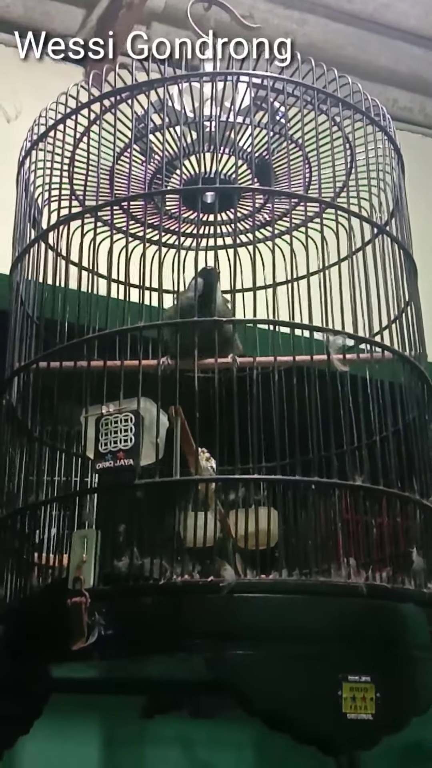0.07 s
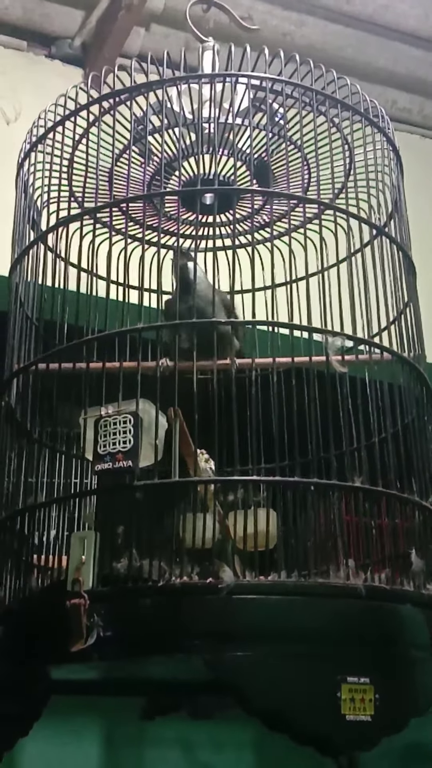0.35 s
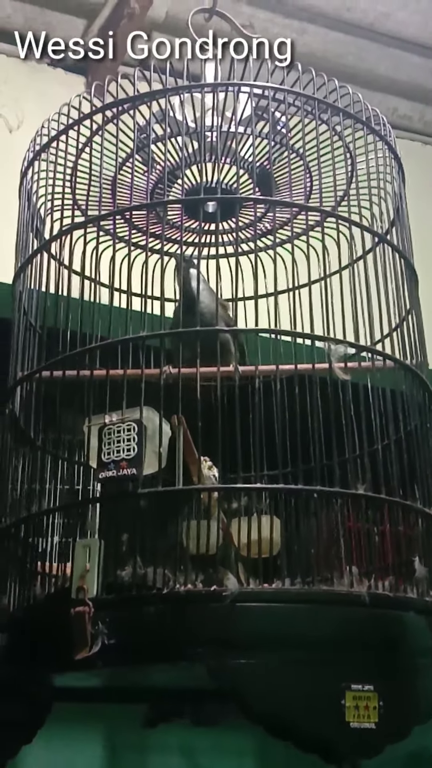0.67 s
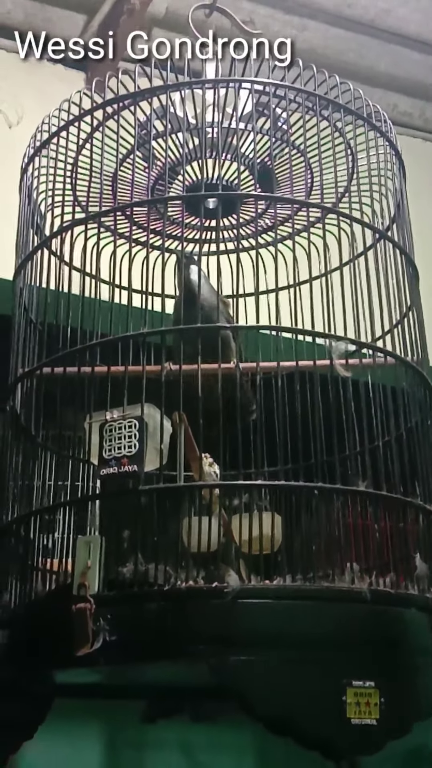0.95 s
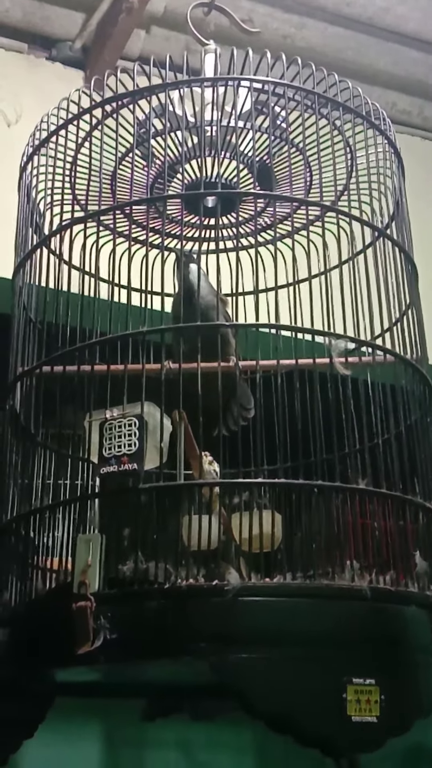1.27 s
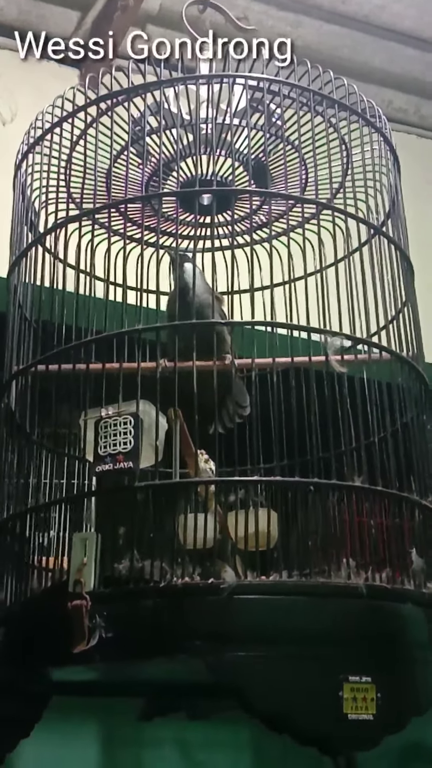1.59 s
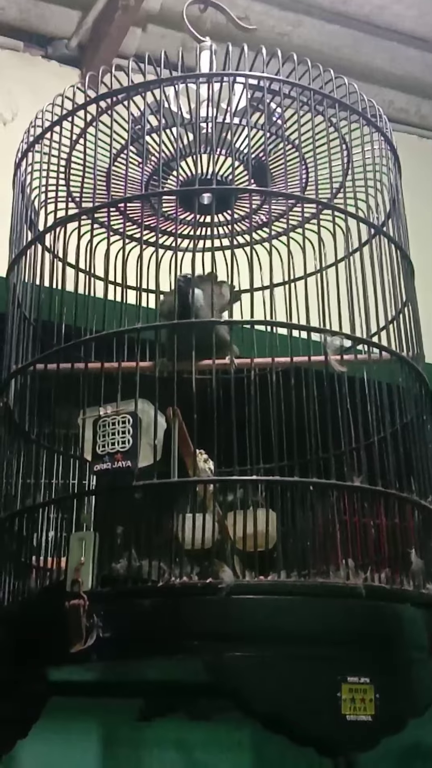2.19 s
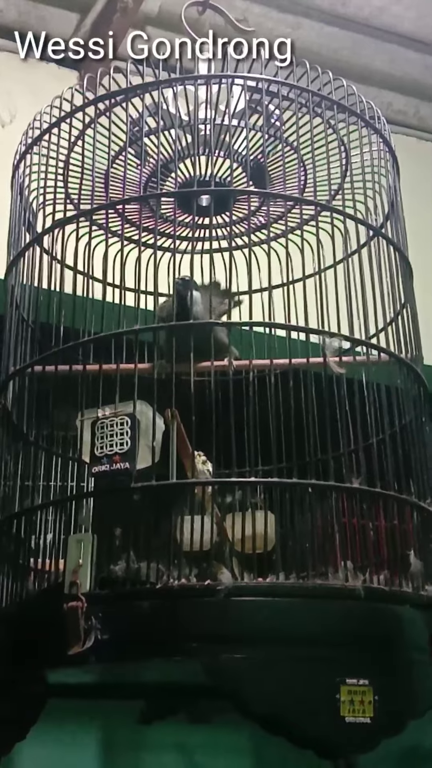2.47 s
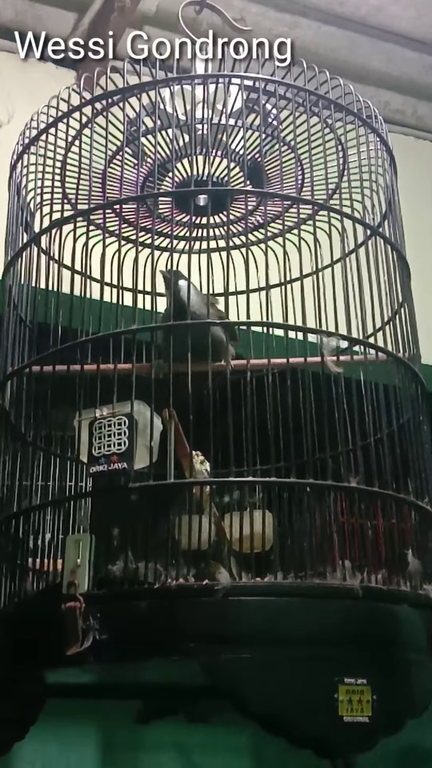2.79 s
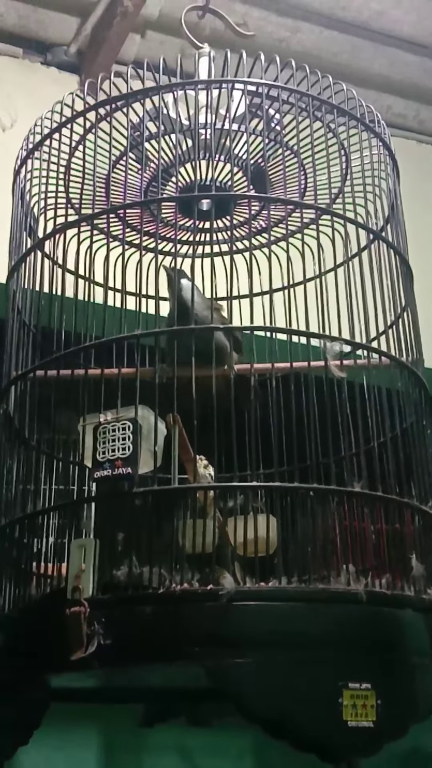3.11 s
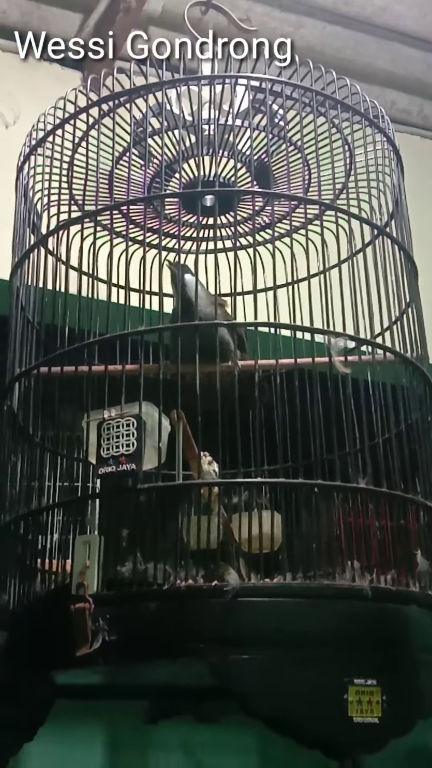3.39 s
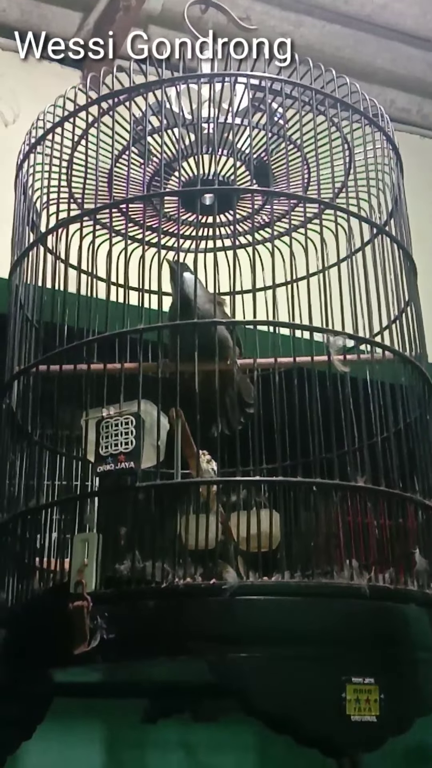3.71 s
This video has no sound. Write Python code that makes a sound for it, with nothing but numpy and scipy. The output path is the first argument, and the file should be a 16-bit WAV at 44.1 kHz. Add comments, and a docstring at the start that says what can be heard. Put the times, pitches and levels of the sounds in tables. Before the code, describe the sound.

A caged bird gives one long whistle, reedy at first, then pure and falling. After a pause come five harsh, evenly spaced barks, each ending in a hoot. The notes ring in a roofed yard over faint outdoor air.

```python
"""A yard with a hard roof. A caged laughingthrush gives one long whistle, reedy at first, then pure
and falling, and five harsh barks. Each bark sweeps up, breaks into a rasp of uneven cycles on the way
down and ends in a clear hoot. Roof and walls ring after every note. Under it: faint outdoor air,
far calls and soft knocks as the bird shifts on its perch. Gain control holds down the loud notes."""
import sys
import numpy as np
from scipy import signal
from scipy.fft import rfft, irfft
from scipy.io import wavfile
from scipy.ndimage import uniform_filter1d, minimum_filter1d

SR = 44100
rng = np.random.default_rng(int(sys.argv[2]) if len(sys.argv) > 2 else 0)


def store_wav(level_fs):
    """Save 16-bit WAV to argv[1]."""
    pcm = np.round(np.clip(np.atleast_2d(level_fs), -1, 1) * 32767)
    wavfile.write(sys.argv[1], SR, pcm.T.astype(np.int16))


N = 169785
TOP_HZ = 15500


def whistle(t, jitter=0.0031, jitter_hz=70):
    """One long note: reedy overtones give way to a pure tone that slides down."""
    # pitch contour: t/s, f/Hz
    contour = [(0.157, 1544), (0.198, 1425), (0.261, 1390), (0.301, 1400), (0.359, 1451), (0.421, 1491),
               (0.478, 1515), (0.551, 1507), (0.632, 1454), (0.722, 1449), (0.759, 1406), (0.802, 1271),
               (.85, 1110), (0.898, 1046), (.96, 951.7), (1.041, 914.2), (1.198, 896.7)]
    # effort: t/s, pure level/dB, reed level/dB, reed treble tilt/(dB/octave)
    effort = [(0.152, -48, -74, -30), (0.171, -33.5, -34, -11), (0.249, -24.5, -19, -7),
              (.32, -39.5, -25.5, -4), (.44, -17, -19, 1.5), (0.486, -29, -20.5, -17),
              (.53, -25.5, -42, -13), (.57, -8, -62.5, 5), (.7, -15, -60.5, -23), (.78, -6.5, -85.5, -3),
              (0.879, -23, -82, 17.5), (0.971, -26.5, -56.5, -13), (1.06, -30.5, -56.5, -4),
              (1.162, -28, -64, -19), (1.22, -68.5, -87, -12)]
    # colour of the reedy overtones: f/Hz, level/dB
    reed_colour = [(1800, -1.5), (2900, -4.5), (4300, -5.5), (5800, -5.5), (7200, -16.5), (8800, -16),
                   (10300, -23), (13200, -31), (15200, -33.5)]
    # faint overtones of the pure tone at its loudest: f/Hz, level/dB re the tone
    pure_colour = [(1850, -34), (2300, -46.5), (2750, -39.5), (3000, -30), (3650, -38), (4500, -68),
                   (5600, -42), (6400, -27), (7300, -29.5), (8500, -53), (11000, -53), (14500, -42)]
    pitch_s, pitch_hz = np.array(contour).T
    hz = uniform_filter1d(np.interp(t, pitch_s, pitch_hz), size=1100)
    hz *= 1 + jitter * waver(jitter_hz)
    effort_s, pure_db, reed_db, tilt_db = np.array(effort).T
    on = (t > effort_s[0]) & (t < effort_s[-1])
    pure_gain = undb(np.interp(t, effort_s, pure_db)) * on
    reed_gain = undb(np.interp(t, effort_s, reed_db)) * on
    push = np.sqrt(pure_gain / pure_gain.max())  # softer is purer
    pure = tone(hz) + push * overtones(hz, pure_colour, count=9)
    reed = overtones(hz, reed_colour, np.interp(t, effort_s, tilt_db), count=10)
    return pure_gain * pure + reed_gain * reed


def bark(t, start_s, stretch, arch, dip, hoot, level_db, bright_db, hoot_db, treble_db, harsh):
    """Arch, dip, hoot; on the slopes the cycles jitter and alternate strong and weak."""
    # one bark: t/s, f/Hz, fundamental/dB, overtones/dB, treble tilt/(dB/octave), rasp/1
    gesture = [(-.001, 1095, -41, -51, -20, 0.14), (.01, 1230, -23.5, -29, -10.5, 0.35),
               (.025, 1755, -27.5, -12.5, -14, 0.42), (.039, 2011, -16, -18.5, -9, 0.05),
               (.051, 1956, -22.5, -11.5, -11, 0.08), (0.06, 1550, -24, -12.5, 1, .5),
               (.078, 1265, -17.5, -15.5, 2, 0.06), (.095, 1308, -17, -34.5, -30, .1),
               (0.11, 1590, -7, -46, 24.5, 0.05), (.127, 1638, -8, -19, 0, 0.02),
               (.146, 1280, -15.5, -19.5, 1.5, 0.03), (.165, 1091, -27.5, -33, -15, 0.73)]
    # throat colour of the overtones: f/Hz, level/dB
    throat = [(2100, 3), (2550, 2), (3100, -8), (3700, -3), (4400, -14.5), (5700, -11), (7200, -18.5),
              (8200, -28), (10000, -26), (12500, -41), (15500, -37)]
    arch_dip_hoot_s = [.045, .083, .115]  # before stretch
    jitter, doubling, rasp_hz = 0.051, .5, 370
    knot_s, pitch_hz, low_db, high_db, tilt_db, rasp = np.array(gesture).T
    age = (t - start_s) / stretch
    on = (age > knot_s[0]) & (age < knot_s[-1])

    def curve(column):
        return uniform_filter1d(np.interp(age[on], knot_s, column), size=220)

    def by_part(*values):
        return np.interp(age[on], arch_dip_hoot_s, values)

    rough = harsh * curve(rasp)
    hz = curve(pitch_hz) * by_part(arch, dip, hoot)
    hz *= 1 + jitter * rough * waver(rasp_hz)[on]
    uneven = waver(rasp_hz)[on] + doubling * tone(hz / 2)
    upper = overtones(hz, throat, curve(tilt_db) + treble_db) * (1 + rough * uneven)
    voice = undb(curve(low_db)) * tone(hz) + undb(curve(high_db) + bright_db) * upper
    out = np.zeros(N)
    out[on] = undb(level_db + by_part(0, 0, hoot_db)) * voice
    return out


def tone(hz):
    """Unit-rms sine on a moving pitch."""
    return np.sqrt(2) * np.sin(2 * np.pi * np.cumsum(hz) / SR)


def overtones(hz, colour, tilt_db_oct=0, count=14, tilt_from_hz=3720):
    """Harmonics from the second up, weighted by the throat, tilted by effort."""
    phase = 2 * np.pi * np.cumsum(hz) / SR
    out = 0
    for k in np.arange(count) + 2:
        octaves = np.log2(np.maximum(k * hz / tilt_from_hz, 1))
        level_db = log_interp(k * hz, colour) + tilt_db_oct * octaves
        out += undb(level_db) * (k * hz < TOP_HZ) * np.sin(k * phase)
    return np.sqrt(2) * out


def yard(x, direct_db=-1, tail_db=-6, build_s=0.032, echoes=40, spread_s=.05):
    """Direct sound, scattered echoes off roof and walls, and a tail that rings longest in the mids."""
    # ring time: f/Hz, T60/s
    ring = [(500, 0.25), (1400, 0.62), (3000, 0.58), (6000, 0.45), (11000, 0.45), (16000, 0.25)]
    band_hz, band_t60_s = np.array(ring).T
    age_s = np.arange(SR) / SR
    white = rfft(rng.standard_normal(SR))
    tail = 0
    for t60_s, share in zip(band_t60_s, np.eye(len(ring))):
        band = log_interp(bins_hz(SR), list(zip(band_hz, share)))
        tail += irfft(white * band, SR) * undb(-60 * age_s / t60_s)
    tail *= 1 - np.exp(-age_s / build_s)
    lag = rng.random(echoes)
    delay_s = .002 + spread_s * lag
    early = np.zeros(SR)
    early[(delay_s * SR).astype(int)] = rng.standard_normal(echoes) * np.exp(-lag)
    response = undb(tail_db) * tail / np.linalg.norm(tail) + early / np.linalg.norm(early)
    return undb(direct_db) * x + signal.fftconvolve(x, response)[:N]


def perch(t, gain_db=6):
    """Soft knocks and rustles as the bird shifts."""
    # noise bursts: t/s, length/s, f/Hz, width/Hz, level/dB before gain
    bumps = [(.99, .1, 150, 80, -57), (1.025, .04, 2900, 1600, -55), (1.53, .06, 135, 80, -51)]
    return undb(gain_db) * swells(t, bumps)


def far_calls(t, gain_db=-2):
    """Faint calls, blurred by distance."""
    # calls: t/s, length/s, f/Hz, width/Hz, level/dB before gain
    calls = [(.02, .2, 386, 20, -54), (.1, .16, 765, 30, -59), (.42, .14, 386, 25, -58),
             (1.68, .2, 330, 25, -59), (2.48, .1, 760, 70, -52), (2.52, .1, 615, 40, -56),
             (2.8, .14, 660, 260, -53), (3.78, .22, 658, 25, -50)]
    return undb(gain_db) * swells(t, calls)


def air(level_db=-51.5, swell_db=-0.5, flicker_db=0.8, bands=9):
    """Outdoor air: octave bands swell together and flicker alone, the low ones most."""
    # air spectrum: f/Hz, relative density/dB
    colour = [(25, -43.5), (50, -29), (80, -8.5), (115, -10.5), (155, -4.5), (260, -12), (380, -7),
              (500, -13), (760, -12), (1050, -18), (1200, -12), (1290, 1.5), (1400, -17), (1530, -11.5),
              (1900, -19.5), (2700, -20), (4000, -28), (5300, -27), (6200, -36.5), (7100, -17.5),
              (7700, -36), (8300, -41), (10500, -34.5), (13300, -38), (15200, -38)]
    hz = bins_hz(N)
    spectrum = rfft(noise(undb(log_interp(hz, colour))))
    octave = np.clip(np.log2(np.maximum(hz, 1) / 60), 0, bands - 1)
    out = 0
    for k in range(bands):
        band = irfft(spectrum * np.maximum(1 - abs(octave - k), 0), N)
        out += band * undb(flicker_db * waver(hz=6) / (1 + k / 6))
    return out * undb(level_db + swell_db * waver(hz=0.67))


def swells(t, table):
    """Noise bands that rise and fade."""
    out = 0
    for peak_s, length_s, hz, width_hz, level_db in table:
        envelope = np.exp(-(2 * (t - peak_s) / length_s) ** 2)
        band = 1 / (1 + (2 * (bins_hz(N) - hz) / width_hz) ** 4)
        out += undb(level_db) * envelope * noise(band)
    return out


def waver(hz):
    """Unit-rms wobble, rolled off above hz."""
    return noise(1 / (1 + (bins_hz(N) / hz) ** 4))


def noise(gain):
    """Unit-rms noise shaped by a gain per bin."""
    white = rng.standard_normal((N // 2 + 1, 2)) @ [1, 1j]
    x = irfft(white * gain, N)
    return x / x.std()


def log_interp(hz, points):
    """Read (f/Hz, value) points on a log-frequency axis."""
    knot_hz, values = np.array(points).T
    return np.interp(np.log(np.maximum(hz, 1)), np.log(knot_hz), values)


def bins_hz(size):
    return np.arange(size // 2 + 1) * SR / size


def undb(db):
    return 10 ** (np.asarray(db) / 20)


def scene(voice_db=-2):
    """The bird turns its head between notes, so each takes its own paths round the yard."""
    # barks: t/s, factors on length and on arch, dip and hoot pitch,
    # offsets to level/dB, overtones/dB, hoot/dB and treble tilt/(dB/octave), rasp factor
    barks = [(1.782, 1.004, 0.94, 0.93, 0.93, -5, -5.5, -6, -2.5, 2.75),
             (2.177, 1.014, 0.95, 0.92, 1.01, -4, 0.5, -5.5, -1.5, 0.99),
             (2.545, 1.0, 1.0, 0.98, 1.047, -2.5, -0.5, -4, -1.5, 1.47),
             (2.956, .98, .99, .94, 1.0, -2, 0.5, -8, 0, 1.01),
             (3.335, 1.07, 1.01, 1, 1.0, -2, 1, -7, -0.5, 1.12)]
    t = np.arange(N) / SR
    notes = [whistle(t)] + [bark(t, *row) for row in barks]
    bird = undb(voice_db) * sum(yard(note) for note in notes)
    return (bird + air() + far_calls(t) + perch(t))[None]


def record(dry, knee_db=-17, slope=.8):
    """Gain control ducks loud notes and the air under them; the recorder cuts the top."""
    power = np.maximum(uniform_filter1d(dry ** 2, size=200), 0) / undb(knee_db) ** 2
    gain = (1 + power ** 2) ** (-slope / 4)
    held = minimum_filter1d(gain, size=1500)
    smooth_gain = uniform_filter1d(held, size=1000)
    lowpass = signal.ellip(10, .2, 80, TOP_HZ, fs=SR, output="sos")
    return signal.sosfilt(lowpass, dry * smooth_gain)


dry = scene()
out = record(dry)
store_wav(out)
```